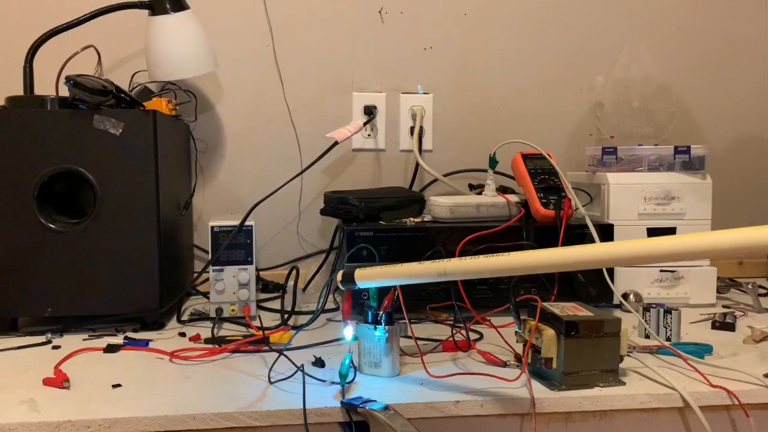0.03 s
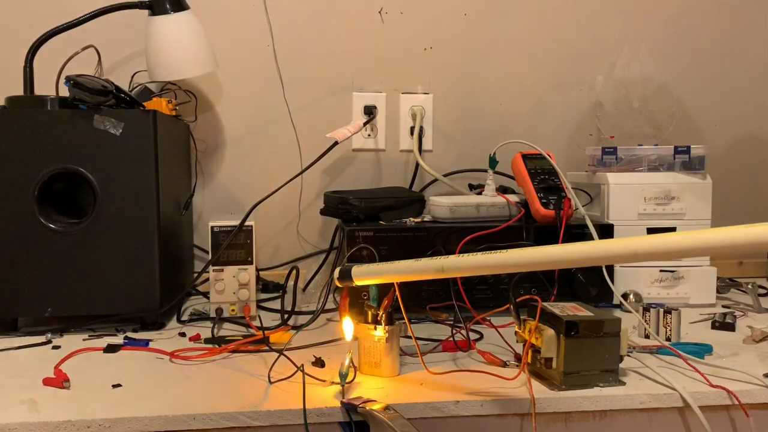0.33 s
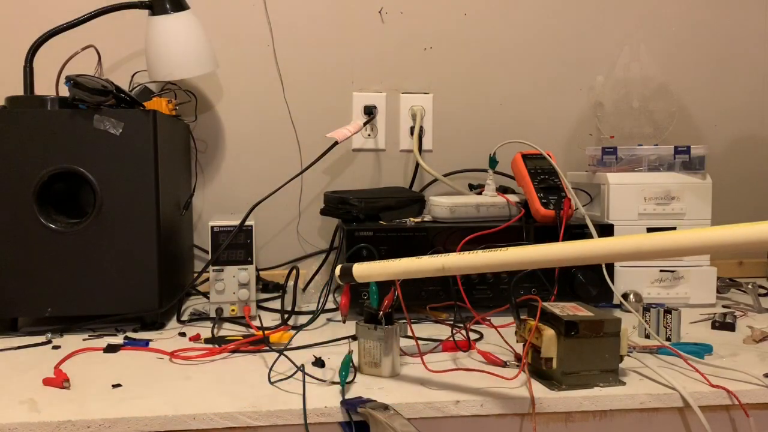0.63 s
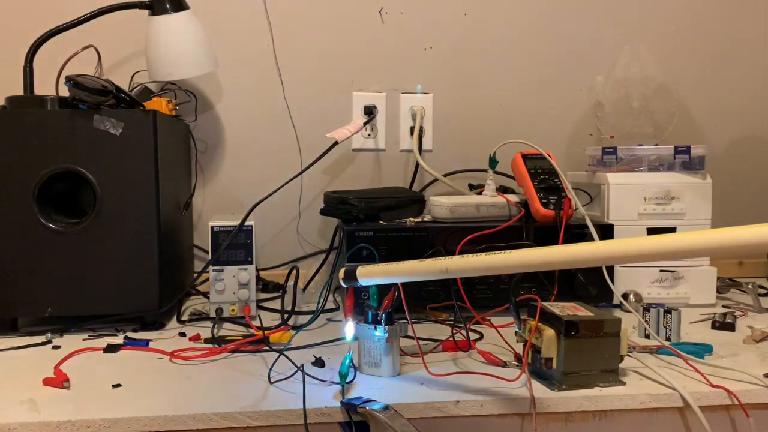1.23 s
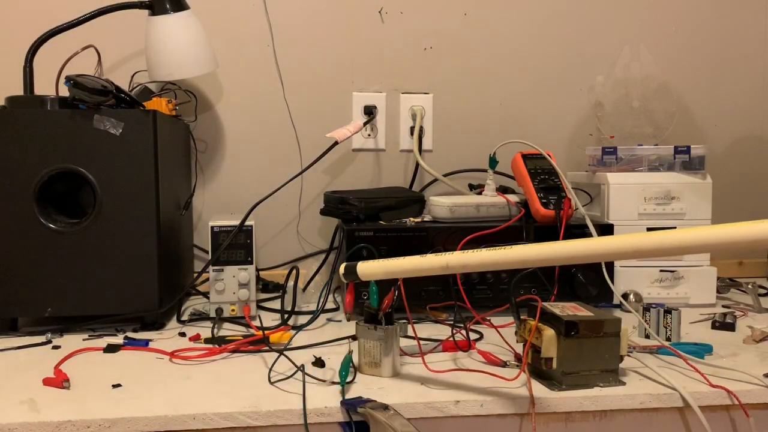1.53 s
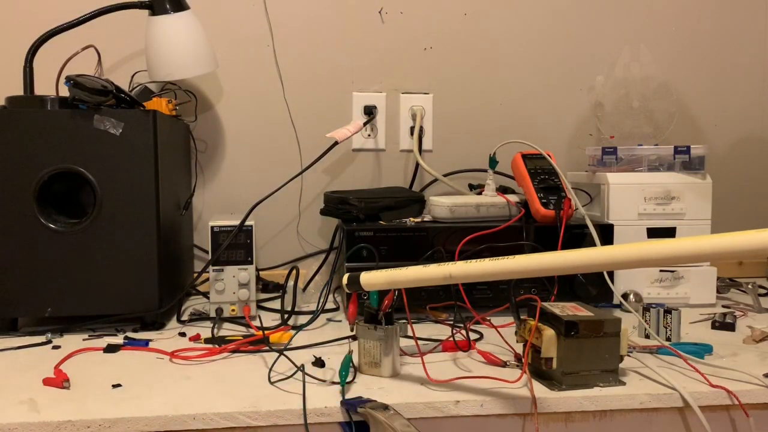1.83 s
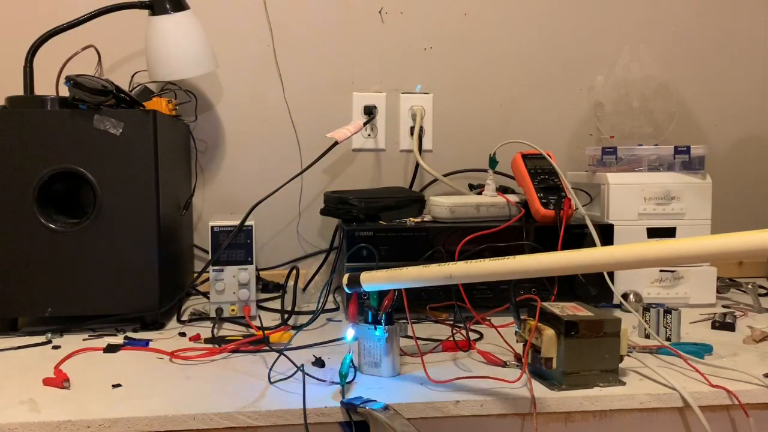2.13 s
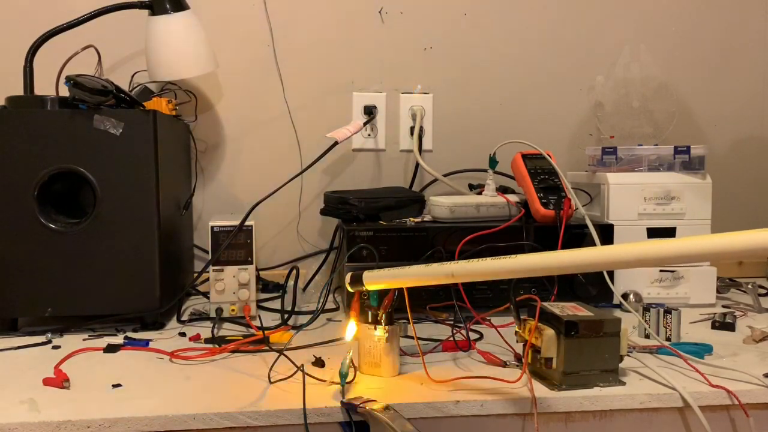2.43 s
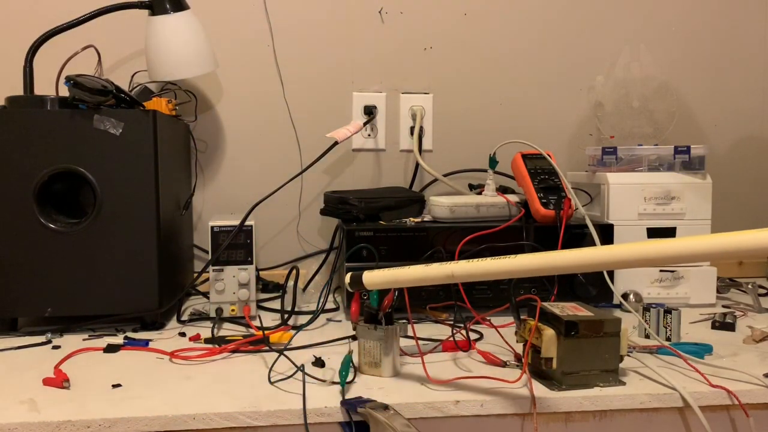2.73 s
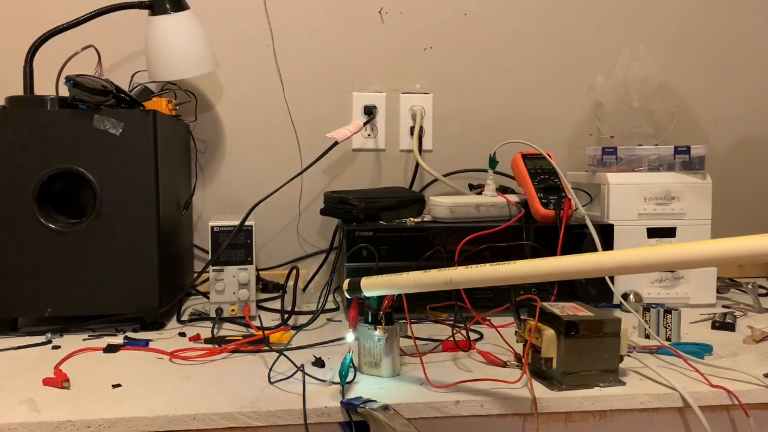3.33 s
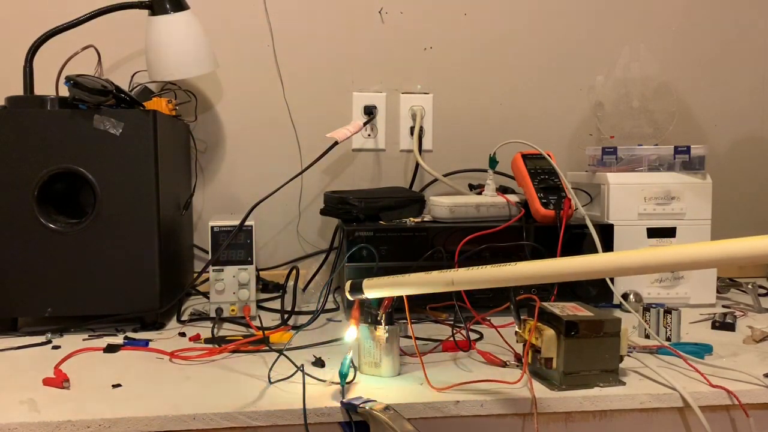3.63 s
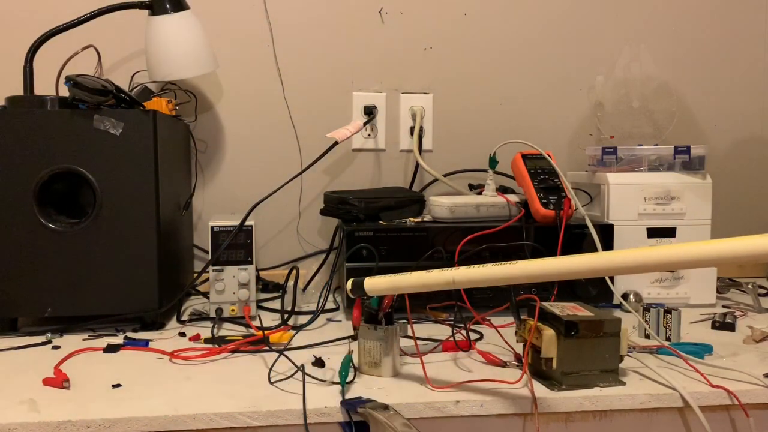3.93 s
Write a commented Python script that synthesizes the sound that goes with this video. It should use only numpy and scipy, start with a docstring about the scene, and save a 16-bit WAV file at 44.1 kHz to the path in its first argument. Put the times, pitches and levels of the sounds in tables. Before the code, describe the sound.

An electric arc crackles and buzzes in four short bursts over a faint hum.

```python
"""A faint low hum fills a small room, where a phone listens near a workbench. Almost at once a
high-voltage arc starts to crackle: it strikes on every second mains cycle and relights twice after each
strike. Each spark is a bright snap plus a duller pop that grows as the arc lengthens; the bench rings
and the walls echo. The arc is drawn three more times, at about 0.85, 1.9 and 2.9 seconds, each time
starting with a dull thump. The last arc stumbles twice and stops just before 3.8 seconds."""
import sys
import numpy as np
from scipy import signal
from scipy.fft import rfft, irfft
from scipy.io import wavfile
from scipy.ndimage import uniform_filter1d

SR = 44100
rng = np.random.default_rng(int(sys.argv[2]) if len(sys.argv) > 2 else 0)


def to_wav(sig):
    """Store sig (one row per channel, or 1-D mono) as 16-bit WAV at the path in sys.argv[1].

    Samples outside -1..1 are clipped; the rate is SR.
    """
    pcm = np.clip(np.atleast_2d(sig), -1, 1) * 32767
    pcm = np.round(pcm).astype(np.int16)
    wavfile.write(sys.argv[1], SR, pcm.T)  # frames by channels


N = 176400  # 4 seconds


def undb(db):
    """Turn decibels into a plain multiplier."""
    return 10 ** (np.asarray(db) / 20)

def along(table, hz):
    """Read a table of frequencies and values, sliding between its rows by musical pitch."""
    freqs, values = np.array(table, float).T
    return np.interp(np.log(np.maximum(hz, 1)), np.log(freqs), values)

def colour(x, tone):
    """Shape a sound with a table of Hz and dB; any ringing comes after a click, never before."""
    gain = undb(along(tone, np.fft.rfftfreq(2 * N, 1 / SR)))
    cepstrum = irfft(np.log(gain))
    cepstrum[1:N] *= 2  # fold the early half of the filter onto the late half
    cepstrum[N + 1:] = 0
    return irfft(rfft(x, 2 * N) * np.exp(rfft(cepstrum)))[..., :N]

def crisp(x, tone):
    """Shape a sound with a table of Hz and dB, delaying nothing, so clicks stay short."""
    gain = undb(along(tone, np.fft.rfftfreq(2 * N, 1 / SR)))
    return irfft(rfft(x, 2 * N) * gain)[:N]

def clicks(times, gains):
    """One tiny click at each time."""
    samples = np.round(np.asarray(times) * SR).astype(int)
    return np.bincount(np.clip(samples, 0, N - 1), gains, N)

def wander(rate):
    """A slow random drift, typically about 1 up or down."""
    step = int(SR / rate)
    return uniform_filter1d(np.repeat(rng.standard_normal(N // step + 2), step), step)[:N]


# The tone of the room's rumble. Each row: frequency in Hz, relative level in dB.
RUMBLE_TONE = [(20, -47.5), (32, -31), (50, -2.5), (75, -3), (105, -10.5), (140, -13.5), (180, -15.5),
               (270, -18.5), (380, -27), (520, -30), (800, -46), (1000, -40), (1400, -59.5), (1750, -46.5),
               (2100, -59), (3200, -64.5), (6000, -80.5)]

def rumble(level_db=-40.5, side_db=-15):
    """The room rumbles softly, almost the same on the left and right."""
    shared, side = colour(rng.standard_normal((2, N)), RUMBLE_TONE)
    stereo = shared + undb(side_db) * np.array([side, -side])
    return stereo * undb(level_db) / np.std(shared)


# The steady notes of the equipment. Each row: frequency in Hz, level in dB.
HUM_NOTES = [(55, -50.5), (136, -52.5), (296, -65), (431, -70), (721, -74.5), (1012, -77), (1690, -84.5),
             (1798, -88.5)]

def hum(waver_db=4.5, drift_hz=1.5):
    """The equipment hums and thinly whines, each note wavering in loudness and pitch."""
    sound = 0
    for hz, db in HUM_NOTES:
        gain = np.sqrt(2) * undb(db + waver_db * wander(6.8))
        cycles = np.cumsum(hz + drift_hz * wander(12)) / SR
        sound += gain * np.sin(2 * np.pi * cycles)
    return sound


# Unbroken runs of strikes; the last three make the fourth arc. Each row: start and end in seconds.
STRIKE_RUNS = [(.0167, .37), (.85, 1.30), (1.9167, 2.47), (2.8667, 3.02), (3.05, 3.63), (3.6667, 3.755)]
# How the arcs change; the pop follows the arc's length.
# Each row: time in seconds, relative snap level in dB, relative pop level in dB.
ARC_LEVELS = [(.01, -2, 1), (0.11, -17.5, 5), (0.188, -21.5, 5), (0.262, -17, 4), (0.361, -21, 0),
              (0.848, -20, -3), (0.958, -20, -4.5), (1.049, -18.5, -1.5), (1.146, -11.5, 0),
              (1.241, -15, 3), (1.299, -12.5, 5.5), (1.908, -17, -1), (2.023, -25, -9), (2.09, -15.5, -1.5),
              (2.18, -15.5, 0.5), (2.318, -17.5, -1.5), (2.39, -22, 6), (2.467, -18, -7),
              (2.859, -14, -1.5), (2.929, -18, 0), (3.011, -27.5, -10.5), (3.059, -18, -5.5),
              (3.148, -14, -1), (3.271, -15.5, -3), (3.42, -15, -3.5), (3.517, -17.5, 6), (3.617, -17, 2.5),
              (3.669, -13, 5), (3.751, -12, -13)]
# Hard cracks, where the gap holds off longer. Each row: start in seconds, relative snap level in dB.
HARD_CRACKS = [(0.0166, -13), (0.0507, -13.5), (0.0859, -10), (0.152, -12), (0.2181, -14.5),
               (0.2845, -14.5), (0.8515, -14), (1.1515, -14.5), (1.184, -14.5), (1.2182, -11),
               (1.2836, -13.5), (1.9188, -15), (1.95, -16), (2.1845, -11.5), (2.2167, -15), (2.2516, -13.5),
               (2.2828, -12), (2.3504, -10.5), (2.418, -13), (2.8687, -14.5), (2.9006, -13.5),
               (3.049, -18.5), (3.1167, -13.5), (3.283, -13), (3.4849, -13), (3.5501, -13), (3.6672, -11.5),
               (3.7007, -11.5), (3.7357, -12)]
# The two relights after a strike.
# Each row: delay in seconds, relative snap level in dB, change in pop level in dB.
RELIGHTS = [(.0067, -25.5, -1), (.0132, -23.5, -2)]
MAINS_HZ, USUAL_SNAP_DB = 60, -16

def sparks(snap_scatter_db=3, pop_scatter_db=2.3, relight_growth=.93):
    """List each spark's time, snap level and pop level: a strike every second cycle, then relights."""
    rows, cracks = [], np.array(HARD_CRACKS)
    when, snap_levels, pop_levels = np.array(ARC_LEVELS).T
    beats = np.concatenate([np.arange(start, end, 2 / MAINS_HZ) for start, end in STRIKE_RUNS])
    for beat in beats:
        time_luck, _, pop_luck = rng.standard_normal(3)
        strike_db = np.interp(beat, when, snap_levels)
        # stronger strikes come a little later in the cycle
        start = beat + .00018 * (strike_db - USUAL_SNAP_DB) + .0002 * time_luck
        crack_start, crack_db = cracks[np.argmin(abs(cracks[:, 0] - beat))]
        if abs(crack_start - beat) < 1 / MAINS_HZ:
            start, strike_db = crack_start, crack_db
        pop_db = np.interp(start, when, pop_levels) + .5 * pop_scatter_db * pop_luck
        rows.append((start, strike_db, pop_db))
        # a hard crack leaves the air hot, so it relights more quietly
        softer_db = .6 * max(strike_db - USUAL_SNAP_DB, 0)
        for delay, relight_db, change_db in RELIGHTS:
            time_luck, snap_luck, pop_luck = rng.standard_normal(3)
            snap_db = relight_db - softer_db + snap_scatter_db * snap_luck
            length_db = relight_growth * np.interp(beat + delay, when, pop_levels)
            pop_db = length_db + change_db + pop_scatter_db * pop_luck
            rows.append((start + delay + .0003 * time_luck, snap_db, pop_db))
    return np.array(rows).T


# The bright tone of a snap. Each row: frequency in Hz, boost or cut in dB.
SNAP_TONE = [(100, -26.5), (1000, -34), (2200, -20.5), (3500, -20), (5500, -13), (7500, -8), (8500, -16.5),
             (9800, -1.5), (12000, -4), (13600, 2), (15500, -1), (16500, -27)]

def snaps(starts, levels_db, gain_db=20):
    """The air gap breaks down with a sharp snap at each spark."""
    return crisp(clicks(starts, undb(levels_db + gain_db)), SNAP_TONE)


# Heavy pops of the stretched, breaking arc. Each row: start in seconds, relative level in dB.
HEAVY_POPS = [(.123, 7.5), (.19, 6), (.1965, 9.5), (.257, 4.5), (.263, 8.5), (.3235, 4.5), (.33, 7),
              (.35, 6), (.3575, 4.5), (1.19, 3), (1.2575, 6), (1.29, 9), (1.297, 8), (2.29, 3.5), (2.39, 2),
              (2.424, 5.5), (2.457, 8), (2.4635, 10.5), (2.467, 6), (3.497, 4), (3.5305, 5.5), (3.5575, 5),
              (3.708, 4), (3.7145, 5), (3.7365, 8), (3.747, 4)]
# The tone of a pop, and of its raspy edge. Each row: frequency in Hz, boost or cut in dB.
POP_TONE = [(50, -12.5), (130, 5), (280, 3), (480, -1), (680, -6), (1150, -1.5), (1430, -6.5), (1700, -3),
            (2050, -6), (2900, 1), (4500, -9), (7000, -31.5), (10000, -10), (16000, -27)]
RASP_TONE = [(500, -31), (2000, -12), (3000, 6.5), (4200, 1.5), (6000, -5.5), (9000, -14), (16000, -36.5)]
# The rasp, harshest as the third arc stretches. Each row: time in seconds, boost or cut in dB.
RASP_AMOUNT = [(0, -20.5), (.4, -8), (.9, -6), (1.15, -3), (1.3, -29), (1.9, -16), (2.199, -7), (2.42, 0.5),
               (2.465, -16), (2.85, -6.5), (3.4, -3.5), (3.75, -15.5)]

def pops(starts, levels_db, gain_db=-7, parts=4, spread_s=.0003):
    """Hot air bursts outward; the parts of the spark's crooked path are heard one after another."""
    # a heavy pop replaces any ordinary pop within 3 milliseconds
    ordinary = abs(starts[:, None] - np.array(HEAVY_POPS)[:, 0]).min(axis=1) > .003
    starts, levels_db = np.vstack([np.c_[starts, levels_db][ordinary], HEAVY_POPS]).T
    delays = spread_s * rng.random((len(starts), parts)).T
    bursts = sum(clicks(starts + delay, undb(levels_db + gain_db)) for delay in delays) / parts
    rasp_db = np.interp(np.arange(N) / SR, *np.array(RASP_AMOUNT).T)
    return colour(bursts, POP_TONE) + colour(bursts * undb(rasp_db), RASP_TONE)


# The notes the bench rings at. Each row: frequency in Hz, width in Hz, dB against the plain sound.
BENCH_NOTES = [(285, 50, -11), (480, 50, -5), (790, 70, 0), (1150, 60, 0), (1292, 40, 4), (1640, 60, 0),
               (1760, 50, 0), (2480, 25, -1), (2780, 50, -1), (3030, 40, 2), (3510, 30, 4), (3652, 20, 1),
               (4060, 35, 0), (4200, 50, -2), (5560, 55, -2), (5930, 40, -1)]

def bench():
    """The bench and its gear ring with every spark: a filter that adds narrow notes to the sound."""
    hz = np.fft.rfftfreq(N, 1 / SR)
    return 1 + sum(undb(db) * 1j * hz * width / (note ** 2 - hz ** 2 + 1j * hz * width)
                   for note, width, db in BENCH_NOTES)


# How long the room's echo lasts. Each row: frequency in Hz, seconds to fade by 60 dB.
TAIL_FADE = [(150, 0.28), (800, 0.35), (2500, 0.2272), (5500, 0.2741), (10000, 0.167), (15000, 0.2152)]
# How strong that echo is. Each row: frequency in Hz, boost or cut in dB.
TAIL_TONE = [(150, 4), (1000, 2), (4000, 2.5), (7500, 1.5), (10000, -2.3), (15000, -3.8)]

def echo_tails(hz, build_s=.003):
    """Countless wall echoes blur into fading noise; gives the spectra of two such tails."""
    t = np.arange(N) / SR
    noise, tails = rfft(rng.standard_normal((2, N))), 0
    edges = np.geomspace(40, SR / 2, 15)
    for low, high in zip(edges, edges[1:]):
        band = irfft(noise * (hz >= low) * (hz < high), N)
        fade_s = along(TAIL_FADE, np.sqrt(low * high))
        shape = undb(-60 * t / fade_s) * (1 - np.exp(-t / build_s))
        tails += band * shape / np.linalg.norm(shape)
    return rfft(tails) * undb(along(TAIL_TONE, hz))


# Quick echoes off bench, gear and wall. Each row: delay in seconds, dB against the direct sound.
NEAR_ECHOES = [(.00045, -10), (.0011, -17), (.0018, -14), (.0025, -15), (.0036, -19), (.0062, -14),
               (.0093, -14), (.011, -18)]
# How wide the tail sounds. Each row: frequency in Hz, share from 0 to 1 that differs between the ears.
TAIL_WIDTH = [(100, 0.1), (300, 0.05), (700, 0.4), (1300, 0.33), (2200, 0.3), (6000, 0.47)]
LEFT_BOOST_DB = .66

def room(treble_hz=8300, low_lead_s=.00007, treble_lead_s=.000186):
    """A stereo filter of direct sound and echoes; lows reach the left first, treble the right."""
    hz = np.fft.rfftfreq(N, 1 / SR)
    delays, db = np.array(NEAR_ECHOES).T
    near = 1 + rfft(clicks(delays, undb(db)))
    tail, side_tail = echo_tails(hz)
    width = along(TAIL_WIDTH, hz)
    shared = near + np.sqrt(1 - width) * tail
    side = np.sqrt(width) * side_tail
    low_lead = np.exp(2j * np.pi * hz * low_lead_s)
    treble_lead = np.exp(2j * np.pi * hz * treble_lead_s)
    lows = np.array([(shared + side) * low_lead * undb(LEFT_BOOST_DB), shared - side])
    treble = np.array([near + tail, (near + tail) * treble_lead])
    treble_share = 1 / (1 + (treble_hz / np.maximum(hz, 1)) ** 24)
    return lows * (1 - treble_share) + treble * treble_share


# The thumps of lighting the arc. Each row: start in seconds, relative level in dB.
LIGHTING_THUMPS = [(.852, 2), (1.918, 2.5), (2.869, 3)]
# Their dull tone. Each row: frequency in Hz, boost or cut in dB.
THUMP_TONE = [(60, -10), (180, -7), (280, 3), (480, -3), (750, -4), (1500, -28), (5000, -51)]

def thumps():
    """A dull thump as the second, third and fourth arcs are lit."""
    starts, db = np.array(LIGHTING_THUMPS).T
    return colour(clicks(starts, undb(db)), THUMP_TONE)


def scene(hiss_db=-83):
    """The arc rings the bench and echoes in the room, over rumble, hum and faint microphone hiss."""
    starts, snap_db, pop_db = sparks()
    arc = snaps(starts, snap_db) + pops(starts, pop_db) + thumps()
    # put time zero in the middle so slightly early sound fits, then trim that delay off
    echoes = np.fft.fftshift(irfft(room() * bench(), N), axes=1)
    heard = signal.fftconvolve(arc[None], echoes, axes=1)[:, N // 2:N // 2 + N]
    lean_left = undb(np.array([[LEFT_BOOST_DB], [-LEFT_BOOST_DB]]) / 2)
    background = (rumble() + hum()) * lean_left
    hiss = undb(hiss_db) * rng.standard_normal((2, N))
    return heard + background + hiss

def record(dry):
    """The phone cuts the treble above 16700 Hz and flattens any peak that is too loud."""
    treble_cut = signal.ellip(8, .1, 40, 16700, fs=SR, output="sos")
    return np.clip(signal.sosfiltfilt(treble_cut, dry), -1, 1)


dry = scene()
out = record(dry)
to_wav(out)
```